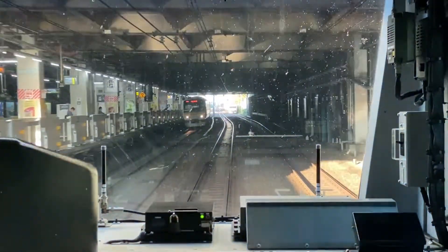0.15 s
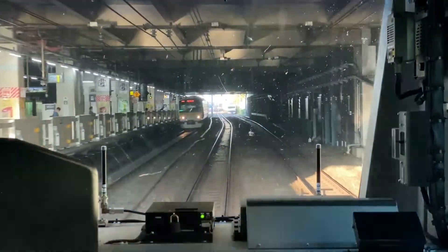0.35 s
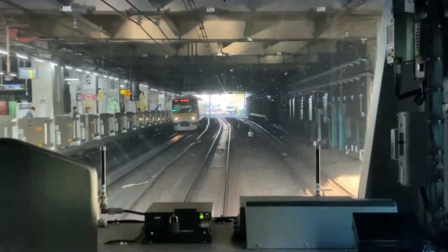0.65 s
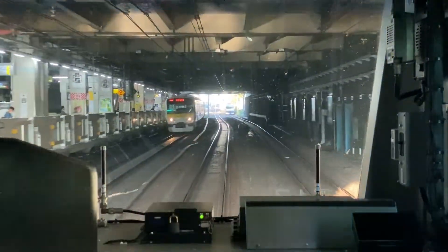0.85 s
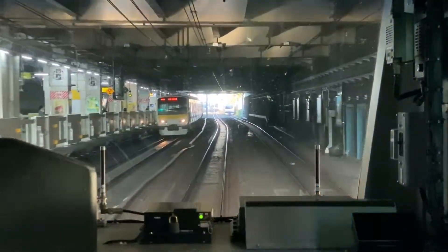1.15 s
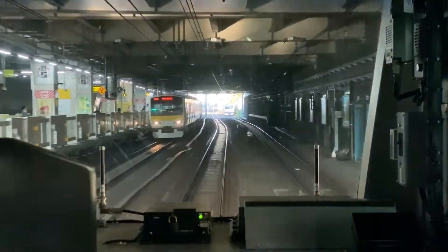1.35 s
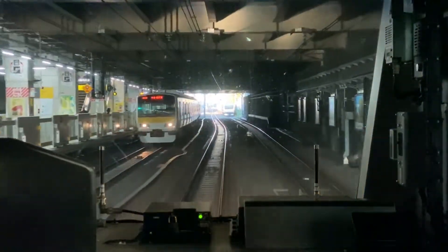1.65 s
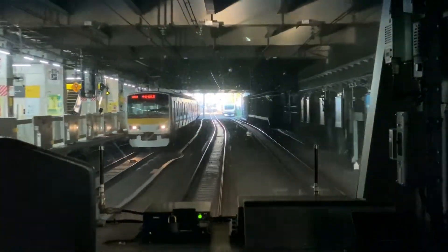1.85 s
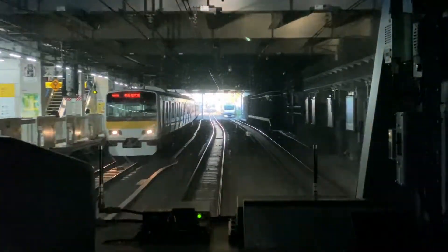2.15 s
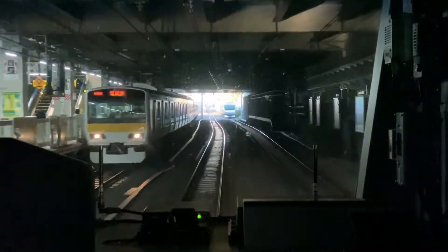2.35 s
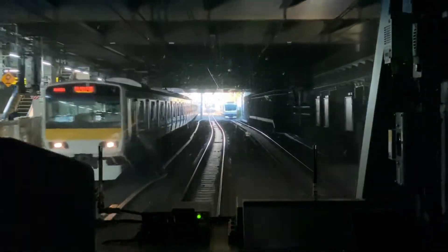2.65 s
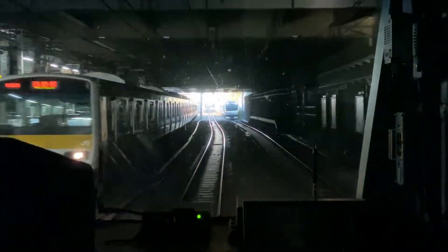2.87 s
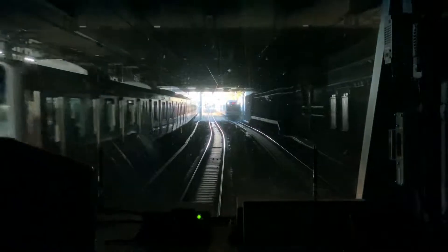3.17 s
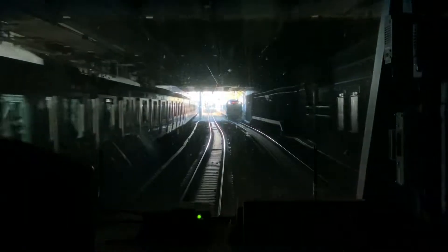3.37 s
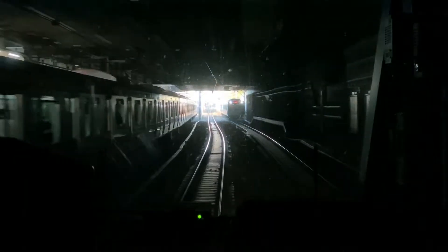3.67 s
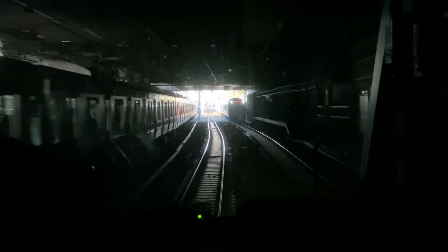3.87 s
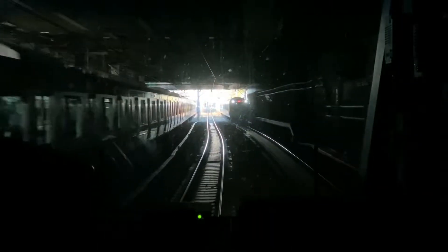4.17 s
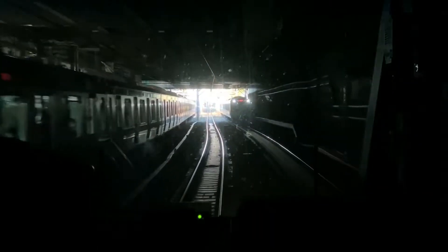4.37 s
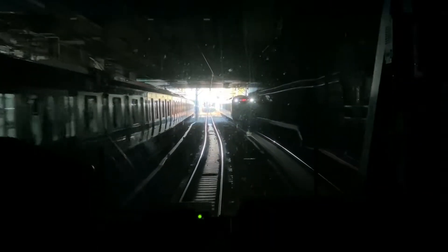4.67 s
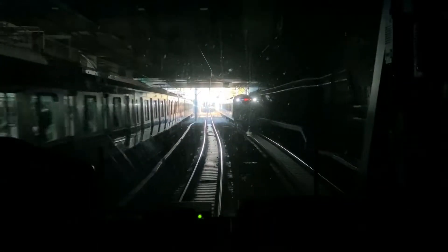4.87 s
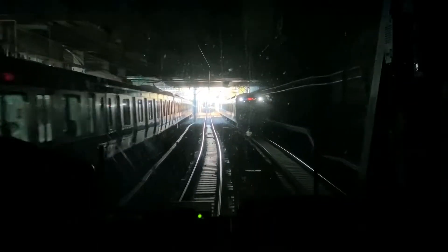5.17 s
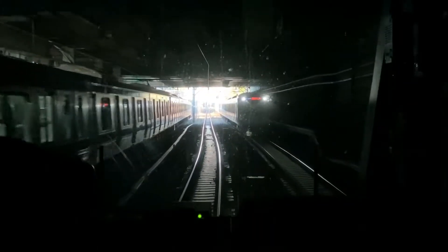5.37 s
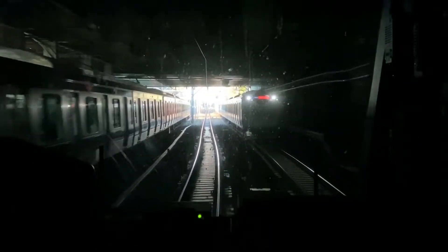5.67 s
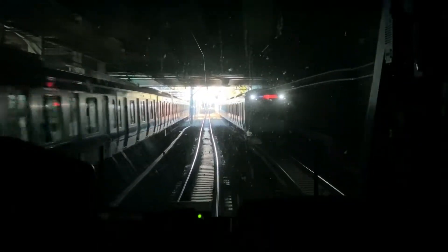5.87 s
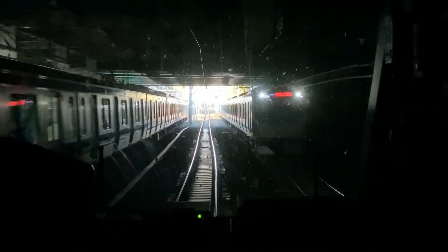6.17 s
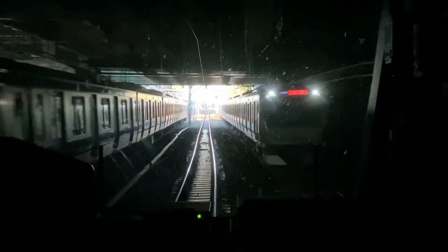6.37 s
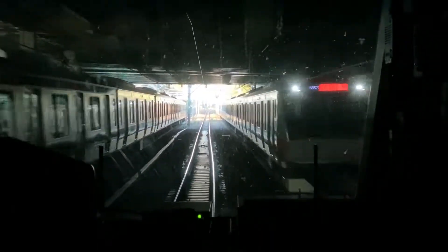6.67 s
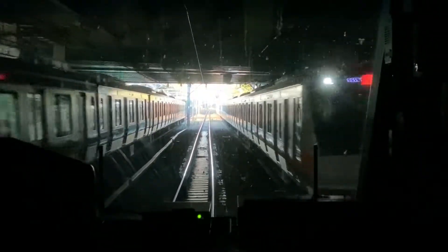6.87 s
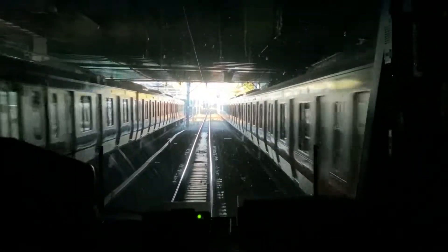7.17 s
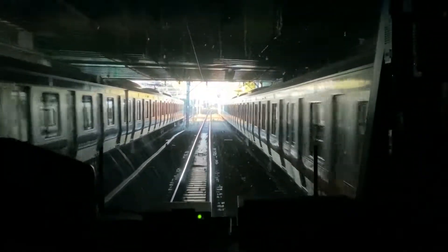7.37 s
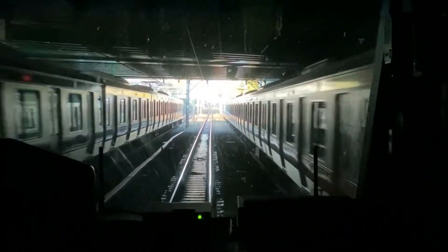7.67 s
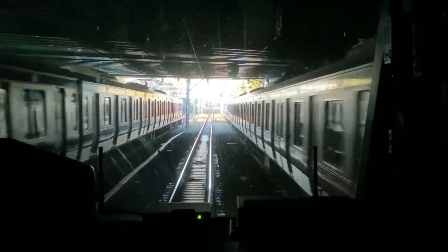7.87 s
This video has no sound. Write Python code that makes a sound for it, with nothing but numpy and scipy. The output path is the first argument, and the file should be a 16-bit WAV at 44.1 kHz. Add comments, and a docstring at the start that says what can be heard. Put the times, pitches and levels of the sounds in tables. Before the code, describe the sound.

Inside the front cab of an electric commuter train passing through a covered station at steady speed. From 0 to 1 s the rolling is rough and loud: roar, a howl sinking quickly within the first 0.4 s, bright flares of gear whine and a light clack near 0.55 s. Another swell of roar comes at 1.5 s, then the ride smooths into low rumble, a wavering, beating mid-low whine and thin hiss with faint whistles. An oncoming train's soft hum slowly sinks from about 2.7 s. At 3.65 s one hard crack and short damped boom stands out. From 4 s an even wash of passing cars joins; soft floor bumps come at 5.3, 5.5 and 6.3 s. Around 7.2 s a second train adds airy wind. At 7.4 s wheels slam over a rail joint in a tight clatter, followed by thuds, ticks, brief groans and rougher rumble until 8 s.

```python
"""A covered station, heard from the front cab of an electric commuter train running through at steady speed.
Shaped noise makes the floor rumble, the roar, the rail hiss and the wash of other trains sliding by.
Fluttering tones make the gear whine and its beats, thin wheel whistles and an oncoming train's sinking hum.
Ringing modes make one hard knock half way, the wheels' clatter over a rail joint and the booming floor;
decaying bursts of noise add thuds, clacks and, mostly near the end, ticks of loose fittings."""
import sys
import numpy as np
from scipy import signal
from scipy.fft import rfft, irfft, next_fast_len
from scipy.io import wavfile
from scipy.ndimage import uniform_filter1d, minimum_filter1d

SR = 44100
rng = np.random.default_rng(int(sys.argv[2]) if len(sys.argv) > 2 else 0)


def persist_wave(psi):
    """Save psi, clipped to +-1, as 16-bit WAV."""
    counts = np.round(np.clip(psi, -1, 1) * 32767).astype(np.int16)
    wavfile.write(sys.argv[1], SR, np.atleast_2d(counts).T)


N = 354122
TIME = np.arange(N) / SR
BINS = np.maximum(np.arange(N // 2 + 1) * SR / N, 1)  # Hz

# stereo width in the cab: f/Hz, side minus mid level/dB
WIDTH = [(25, -25), (60, -22.5), (150, -15.5), (380, -18), (560, -7), (800, -1.5), (1350, -2), (1600, -6.5),
         (1950, -18), (2250, -41.5), (3500, -18), (8000, 0.5)]
# state of the rail, over its smoothest stretch: t/s, roughness/dB
RAIL = [(0, 10.5), (.35, 10), (.7, 10.5), (.9, 2), (1.2, 5.5), (2, -0.7), (3.4, -1.06), (5, 0.5),
        (6.5, 0.5), (8.03, 6.5)]
# drive: t/s, tooth-mesh pitch f/Hz, roughness/0-1
DRIVE = [(0, 391.8, 1), (.6, 394.5, 0.55), (1.1, 386.9, 0.7), (1.8, 384.5, 0.25), (2.5, 389, 0.2),
         (3.5, 387.9, 0.5), (4.8, 386.9, 0.3), (5.5, 381.4, 0.6), (6.5, 386.2, 0.4), (7.2, 383.4, 0.8),
         (8, 383.1, 0.7)]


def from_db(db):
    """Decibels to gain."""
    return 10 ** (np.asarray(db) / 20)


def rms_one(x):
    """Scale to unit power."""
    return x / np.sqrt(np.mean(x ** 2) + 1e-20)


def in_time(rows):
    """Each column of a curve table at every sample."""
    s, *columns = np.transpose(rows)
    return [np.interp(TIME, s, column) for column in columns]


def gain_at(points, hz):
    """Gain of a spectrum, drawn in straight lines over log frequency, at the given frequencies."""
    at, db = np.transpose(points)
    return from_db(np.interp(np.log(hz), np.log(at), db))


def left_right(mid, side):
    """Two channels from their common and opposed parts."""
    return np.array([mid + side, mid - side])


def flutter(width_hz):
    """Complex random swell of unit power whose spectrum is a bell of the given width."""
    size = N // 32  # the swell is slow, so a thirty-second of the sample rate is enough
    bell = 1 / (1 + (BINS[:size // 2 + 1] / width_hz) ** 2) ** 2
    real, imaginary = irfft(rfft(rng.standard_normal((2, size))) * bell, size)
    coarse = rms_one(real) + 1j * rms_one(imaginary)
    return np.interp(np.linspace(0, size - 1, N), np.arange(size), coarse) / np.sqrt(2)


def narrow_line(pitch, rough, width_hz):
    """A steady tone plus a share that flutters, near unit power in the mid; the side always flutters."""
    rough = np.clip(rough, 0, 1)
    cycles = np.cumsum(pitch) / SR + rng.random()
    tone = np.sqrt(2) * np.exp(2j * np.pi * cycles)
    mid = np.sqrt(1 - rough) + np.sqrt(rough) * flutter(width_hz)
    side = gain_at(WIDTH, pitch.mean()) * flutter(width_hz)
    return left_right((tone * mid).real, (tone * side).real)


def cab_noise(spectrum):
    """Stereo noise of the given colour, diffuse where the cab makes it so; mid rms 1."""
    size = next_fast_len(N)
    hz = np.maximum(np.arange(size // 2 + 1) * SR / size, 1)
    treble_fall = 1 + (hz / spectrum[-1][0] / 2) ** 4
    bass_fall = 1 + (spectrum[0][0] / 2 / hz) ** 2
    colour = gain_at(spectrum, hz) / treble_fall / bass_fall
    white = rfft(rng.standard_normal((2, size)))
    mid, side = irfft(white * [colour, colour * gain_at(WIDTH, hz)], size)[:, :N]
    return left_right(mid, side) / np.std(mid)


def swell(s, half_width):
    """A bell in time, of height 1."""
    return np.exp(-((TIME - s) / half_width) ** 2)


def swells(rows):
    """Gain of a series of bells in time."""
    return sum(from_db(db) * swell(s, half_width) for s, half_width, db in rows)


def struck(s, rise, t60):
    """A quick rise at time s, then a steady decay."""
    age = np.clip(TIME - s, 0, 1)
    return (1 - np.exp(-age / rise)) * from_db(-60 * age / t60)


def arrive(s, rise):
    """A smooth step from 0 to 1 around time s."""
    return 1 / (1 + np.exp((s - TIME) / rise))


def ring(modes, hits, rise_cycles, sag=0, sag_s=0.0093):
    """Every hit rings the same modes; high ones answer first, low ones need longer to build up."""
    response, age = 0, TIME[:SR // 2]
    # struck hard, the pitch starts sharp by the share sag and relaxes over sag_s
    turned = age + sag * sag_s * (1 - np.exp(-age / sag_s))
    for k, (hz, db, t60) in enumerate(modes):
        build_up = 1 - np.exp(-(age * hz / rise_cycles) ** 2)
        decay = from_db(db - 60 * age / t60)
        polarity = (-1) ** k
        mode = polarity * decay * build_up * np.exp(2j * np.pi * hz * turned)
        response = response + left_right(mode.imag, gain_at(WIDTH, hz) * mode.real)
    out = np.zeros((2, N + SR))
    for s, db in hits:
        start = int(s * SR)
        out[:, start:start + len(age)] += from_db(db) * response
    return out[:, :N]


def track():
    """Levels of roar, drone and hiss in dB: each follows the state of the rail and swells over worn patches."""
    # worn patches under the wheels: t/s, half width/s, added roar level/dB, drone level/dB, hiss level/dB
    patches = [(.04, 0.14, 7, 5.5, 5.5), (0.221, 0.11, 0.5, 4.5, 0), (.58, 0.12, 2, 0.5, 0.5),
               (1.059, 0.12, 1.5, 2.5, 1), (1.5, 0.13, 7.5, 6, 0.5), (2.8, .07, 0, 9.5, 0.5),
               (3.95, 0.23, 1, 5, 2.5), (5.95, 0.33, 0, 4.5, 3), (7, 0.34, -0.5, 2, -1),
               (7.34, 0.069, 2, 9, 2), (7.62, 0.074, 0.5, 10, -2.5)]
    rough_db, = in_time(RAIL)
    patches_db = sum(np.outer(added_db, swell(s, half_width)) for s, half_width, *added_db in patches)
    # level on smooth rail in dB, plus dB gained per dB of roughness
    roar_db = -38 + 0.97 * rough_db
    drone_db = -34.5 + 0.62 * rough_db
    hiss_db = -47.5 + 0.48 * rough_db
    return patches_db + [roar_db, drone_db, hiss_db]


def rolling():
    """Rough wheels on rough rail: rumble in the floor, drone in the body panels, roar and hiss from the track."""
    # level of the floor rumble: t/s, level/dB
    rumble_level = [(0, -34), (1.1, -32.5), (2.9, -35.5), (4.15, -27.5), (4.6, -35), (5.4, -30.5),
                    (5.8, -32.5), (7, -29), (7.7, -25.5), (8.03, -30)]
    # colour of the floor rumble: f/Hz, density/dB per Hz
    rumble_colour = [(15, -28.5), (30, -14.5), (45, -7), (64, 1.5), (82, -4.5), (115, -8), (160, -11.5),
                     (210, -22), (400, -62)]
    # colour of the body panels: f/Hz, density/dB per Hz
    drone_colour = [(120, -22.5), (175, -10.5), (205, -1.5), (232, -5), (260, 0.5), (290, -3.5),
                    (330, -0.5), (380, -3.5), (450, -18.5), (800, -54)]
    # colour of the wheels: f/Hz, density/dB per Hz
    roar_colour = [(220, -26), (330, -8.5), (430, 7), (490, -2.5), (545, 2.5), (610, -5.5), (670, -2),
                   (830, -2), (930, -12), (1130, -12.5), (1330, -24), (1800, -17.5), (3000, -58)]
    # colour of the rail hiss: f/Hz, density/dB per Hz
    hiss_colour = [(700, -23), (1100, -8.5), (1370, -1.5), (1570, 6.5), (1730, 2), (1920, 7), (2150, -2.5),
                   (2450, -5), (2780, -4.5), (3500, -14.5), (4900, -25.5), (6400, -33.5), (7800, -47),
                   (9700, -44), (15500, -55.5)]
    rumble_db, = in_time(rumble_level)
    roar_db, drone_db, hiss_db = track()
    rumble = from_db(rumble_db) * cab_noise(rumble_colour)
    drone = from_db(drone_db) * cab_noise(drone_colour)
    roar = from_db(roar_db) * cab_noise(roar_colour)
    hiss = from_db(hiss_db) * cab_noise(hiss_colour)
    return rumble + drone + roar + hiss


def gear_lines(lines, pitch, rough):
    """Lines that follow the tooth-mesh pitch and flutter as the tooth load varies."""
    return sum(from_db(db) * narrow_line(multiple * pitch, rough, width_hz) for multiple, db, width_hz in lines)


def gears():
    """The mesh tone beats against its sidebands and sways with the tooth load; its overtones are more blurred."""
    # gear load, before the trims below: t/s, mesh tone level/dB, octave level/dB
    load_curve = [(0, -27, -29), (.3, -25.5, -35.5), (.6, -25, -24.5), (1.1, -23.5, -40.5),
                  (1.75, -30.5, -32.5), (2.4, -24, -35.5), (2.9, -29.5, -37.5), (3.2, -31.5, -37.5),
                  (3.6, -28.5, -40), (4, -30.5, -38.5), (4.25, -28, -47.5), (4.5, -31, -38),
                  (4.72, -27, -30.5), (5.2, -34, -29.5), (5.5, -28.5, -33), (6.1, -27.5, -38),
                  (6.65, -27, -35), (8.03, -28.5, -38)]
    # mesh tone with sidebands one shaft turn apart: multiple of the mesh pitch, level/dB, width/Hz
    mesh_lines = [(.953, -5, 6.4), (1, -3.5, 24), (1.047, -11, 13)]
    # lines around the octave: multiple of the mesh pitch, level/dB, width/Hz
    octave_lines = [(1.91, -7.5, 29), (1.95, -6.5, 22), (2.008, -7.5, 26)]
    # upper gear lines: multiple of the mesh pitch, level/dB, width/Hz
    high_lines = [(2.97, -26.5, 60.2), (4.02, -25, 31.75), (4.92, -25, 53.1)]
    mesh_trim_db, octave_trim_db, high_trim_db = 0.84, -1.5, 1.5
    sway_db, wander_hz, sway_width_hz = 2.3, 2.2, 16
    octave_share = 0.43  # how far the upper lines follow the octave; the rest follows the mesh tone

    pitch, rough = in_time(DRIVE)
    mesh_db, octave_db = in_time(load_curve)
    sway = np.sqrt(2) * flutter(sway_width_hz)
    pitch = pitch + wander_hz * sway.imag
    load = rms_one(from_db(sway_db * sway.real))
    mesh = from_db(mesh_db + mesh_trim_db) * gear_lines(mesh_lines, pitch, rough)
    octave = from_db(octave_db + octave_trim_db) * gear_lines(octave_lines, pitch, rough=0.99)
    high_db = mesh_db + octave_share * (octave_db - mesh_db) + high_trim_db
    high = from_db(high_db) * gear_lines(high_lines, pitch, rough=0.93)
    return load * (mesh + octave + high)


def flares():
    """A jerk presses the teeth together: for a moment the mesh tone and its overtones ring out clean."""
    # jerks of the drive: t/s, half width/s, mesh tone level/dB, octave level/dB
    jerks = [(0.063, 0.0076, -20, -27), (.185, 0.031, -15, -32.5), (0.419, 0.073, -25.5, -35),
             (0.577, 0.028, -14.5, -21), (.74, 0.046, -24, -33), (0.846, 0.014, -23.5, -35),
             (5.312, 0.014, -21, -38), (5.384, 0.014, -17, -42), (5.467, 0.019, -21, -40),
             (5.871, 0.016, -22.5, -39), (7.575, .028, -20.5, -36.5), (7.797, 0.012, -22.5, -53)]
    # overtones that ring with the octave: multiple of the mesh pitch, level/dB
    flare_overtones = [(2, 2), (3, -22.5), (4, -13.5)]
    side_width_hz = 16
    pitch, _ = in_time(DRIVE)
    mesh_gain = swells([(s, half_width, db) for s, half_width, db, _ in jerks])
    octave_gain = swells([(s, half_width, db) for s, half_width, _, db in jerks])
    overtones = sum(from_db(db) * narrow_line(multiple * pitch, 0, side_width_hz)
                    for multiple, db in flare_overtones)
    return mesh_gain * narrow_line(pitch, 0, side_width_hz) + octave_gain * overtones


def wheel_whistles():
    """Thin whistles of the wheels, of fixed pitch, that swell on rough rail."""
    # whistles: f/Hz, level/dB, width/Hz
    whistles = [(2747, -5, 10), (2765, -2, 70), (3768, -20, 45)]
    smooth_rail_db, follows = -62.5, 0.7  # follows: dB gained per dB of roughness
    rough_db, = in_time(RAIL)
    lines = sum(from_db(db) * narrow_line(np.full(N, hz), 0.75, width_hz) for hz, db, width_hz in whistles)
    return from_db(smooth_rail_db + follows * rough_db) * lines


def singing_lines():
    """Wheel resonances and gear lines that sing out for a moment."""
    # wheel resonances and gear lines: t/s, half width/s, f/Hz, level/dB, width/Hz
    moments = [(.11, 0.067, 2770, -42, 70), (1.52, 0.068, 2755, -47, 71), (2.35, .7, 2745, -56, 45),
               (2.57, 0.057, 4450, -71, 110), (2.72, .2, 3760, -67.5, 170), (5.83, .22, 2725, -50.5, 50),
               (1.15, 0.15, 1895, -47, 55), (2.99, 0.073, 1915, -50, 35), (4.951, .4, 1890, -45, 60),
               (5.8, .25, 1916, -47.5, 60), (5.9, .3, 1565, -50, 35), (0.584, .035, 1590, -36.5, 25),
               (7.7, 0.8, 1610, -51, 55), (.07, 0.092, 540, -30.5, 35), (.6, 0.058, 435, -27.5, 45),
               (4.24, 0.17, 735, -33.5, 25), (5.35, 0.16, 722, -39, 40)]
    total = 0
    for s, half_width, hz, db, width_hz in moments:
        tone = narrow_line(np.full(N, hz), 1.0, width_hz)
        total = total + from_db(db) * swell(s, half_width) * tone
    return total


def howl():
    """A rough resonance from worn rail sinks in pitch and dies away as the wheels leave it."""
    # the sinking howl: t/s, f/Hz, level/dB
    howl_curve = [(0, 432.7, -18.5), (.08, 352.6, -26), (.13, 368, -42), (.185, 362.8, -15.5),
                  (.25, 289, -24), (.32, 265.5, -32.5), (.45, 259, -69)]
    hz, db = in_time(howl_curve)
    return from_db(db) * narrow_line(hz, rough=0.49, width_hz=67)


def cab_air():
    """A faint steady hiss of air in the cab."""
    # colour of the air: f/Hz, density/dB per Hz
    air_colour = [(3000, -8), (4300, 1.5), (5200, -6), (6400, -1.5), (7800, -23), (9700, -17.5),
                  (15500, -29)]
    return from_db(-74) * cab_noise(air_colour)


def jolts():
    """Each blow sets off a dull thud and a steel clack that die away together; loose fittings add bright ticks."""
    # blows on the wheels and the cab: t/s, thud level/dB, clack level/dB, t60/s
    blows = [(.16, -31, -45.5, 0.28), (.555, -28.5, -33, 0.3), (3.648, -13.5, -28, .12),
             (4.138, -59, -37, .082), (7.386, -21, -21.5, 0.13), (7.395, -12, -25.5, 0.19),
             (7.412, -15, -22.5, 0.069), (7.426, -9, -27, 0.44), (7.526, -16.5, -31, 0.42),
             (7.635, -22.5, -31.5, 0.29)]
    # ticks of loose fittings: t/s, level/dB
    tick_hits = [(.555, -62.5), (1.723, -68), (3.058, -62), (4.138, -66), (7.398, -54), (7.459, -50.5),
                 (7.521, -48.5), (7.742, -54)]
    # colour of a thud through the floor: f/Hz, density/dB per Hz
    thud_colour = [(30, -29.5), (70, -4.5), (130, -2.5), (180, -3.5), (245, 2), (330, -2.5), (520, -12),
                   (800, -28), (2000, -60)]
    # colour of the steel clack: f/Hz, density/dB per Hz
    clack_colour = [(250, -13), (470, 6), (800, 1.5), (1020, 0), (1300, -5.5), (1590, -1), (1950, -7),
                    (2600, -9.5), (3900, -22), (4600, -33.5), (7000, -42.5), (12000, -57.5)]
    # colour of the ticks: f/Hz, density/dB per Hz
    tick_colour = [(1500, -20), (3500, 4.5), (6000, 7), (8000, -6.5), (10000, -8.5), (12000, -17),
                   (15500, -25)]
    rise_share = 0.0071  # rise time of a blow as a share of its t60
    rattle_db, rattle_hz = 0.5, 130

    # overlapping bursts add in power
    thud_power = clack_power = 0
    for s, thud_db, clack_db, t60 in blows:
        shape = struck(s, rise_share * t60, t60)
        thud_power = thud_power + (from_db(thud_db) * shape) ** 2
        clack_power = clack_power + (from_db(clack_db) * shape) ** 2
    tick_power = sum((from_db(db) * struck(s, rise=0.008, t60=0.22)) ** 2 for s, db in tick_hits)
    thud = np.sqrt(thud_power) * cab_noise(thud_colour)
    clack = np.sqrt(clack_power) * cab_noise(clack_colour)
    tick = np.sqrt(tick_power) * cab_noise(tick_colour)
    # loose parts chatter unevenly
    rattle = rms_one(from_db(rattle_db * rms_one(flutter(rattle_hz).real)))
    return thud + rattle * clack + tick


def scuff():
    """Short bright rubs of steel on steel that swell and fade."""
    # rubs: t/s, half width/s, level/dB
    rubs = [(1.805, 0.05, -44), (3.07, 0.021, -48), (7.545, .026, -45)]
    # colour of the rubs: f/Hz, density/dB per Hz
    rub_colour = [(1000, -10), (2000, 4.5), (2450, 3), (3200, -8.5), (4300, -24), (7000, -51)]
    return swells(rubs) * cab_noise(rub_colour)


def oncoming_hum():
    """The motors of the train on the next track fall in pitch as it passes, and fade behind the cab."""
    # hum of the oncoming train: t/s, f/Hz, level/dB
    hum_curve = [(2.4, 335, -60), (2.75, 331, -36.5), (3.25, 321, -39.5), (3.6, 311, -32.5),
                 (4.15, 299, -39), (4.7, 272, -39), (5.4, 262, -44.5), (6.2, 251, -36.5), (7, 243, -46)]
    hz, db = in_time(hum_curve)
    return from_db(db) * narrow_line(hz, rough=0.6, width_hz=13)


def knock():
    """A short crack in the cab wall, then a full boom that is soon damped; a faint, very high ring sounds with it."""
    # modes of the cab wall, before the low-pass and damping: f/Hz, level/dB, t60/s
    wall_modes = [(138, -7, .125), (202.8, -6.5, 0.65), (231.5, 1.5, 0.094), (264, 1.3, 0.1),
                  (286, -8.5, 0.35), (339, -4.5, 0.38), (401, -6.5, 0.11), (475, -15, 0.24),
                  (555, -12, 0.16), (633, -13.5, .096), (775, -28.5, .106), (1070, -17, 0.053),
                  (1330, -16, 0.035), (1624, -3.5, 0.018), (2703, -11, 0.006)]
    # modes of the faint high ring, before the damping: f/Hz, level/dB, t60/s
    high_ring_modes = [(5300, -44, .011), (7300, -57, .015), (9500, -64, .015), (11650, -73, .17),
                       (12350, -74, .17)]
    knock_s, hold_s, fade_s = 3.6445, 0.078, 0.012  # the ringing is damped once the hold is over
    wall = ring(wall_modes, [(knock_s, 0)], rise_cycles=0.66, sag=0.086)
    low_pass = signal.butter(3, 1480, fs=SR, output="sos")
    boom = signal.sosfilt(low_pass, wall)
    high_ring = ring(high_ring_modes, [(knock_s, -2.5)], rise_cycles=4.0)
    damping = 0.5 - 0.5 * np.tanh((TIME - knock_s - hold_s) / fade_s)
    return damping * (boom + high_ring)


def passing_trains():
    """Cars sliding by on the next tracks add an even wash; the second train squeezes bright wind past the cab."""
    # trains draw level, then their wash holds steady: t/s, rise/s, level/dB
    passes = [(4.1, .22, -48), (7.199, 0.28, -48.5)]
    # colour of a passing train: f/Hz, density/dB per Hz
    wash_colour = [(1200, -11.5), (1650, 6.5), (1900, 0.5), (2200, -4), (2650, -1.5), (3250, -5.5),
                   (3900, -17), (5000, -26), (8000, -49.5)]
    # colour of wind squeezed between the cab and the nearest train: f/Hz, density/dB per Hz
    wind_colour = [(3000, -2.5), (5000, 3), (7000, -6.5), (10000, -15.5), (15500, -19.5)]
    power = sum((from_db(db) * arrive(s, rise)) ** 2 for s, rise, db in passes)
    wash = np.sqrt(power) * cab_noise(wash_colour)
    wind = from_db(-65.5) * arrive(s=7.4, rise=0.25) * cab_noise(wind_colour)
    return wash + wind


def undercarriage():
    """The wheels drop into the rail joint and ring the bogie; bumps set the floor booming on its springs."""
    # modes of the bogie frame and its wheels: f/Hz, level/dB, t60/s
    bogie_modes = [(102.7, -0.5, 0.19), (137, -5, .14), (178, -9, .12), (234.8, -6, .3), (269, -5.5, 0.19),
                   (375.5, -4.5, .15), (444, -10, 0.18), (680, -15.5, 0.06), (785, -15, .07),
                   (956, -12.5, 0.053), (1046, -16.5, 0.076), (1575, -23, 0.069)]
    # drops into the rail joint: t/s, level/dB
    joint_strikes = [(7.3962, -11.5), (7.419, -6), (7.44, -13.5), (7.528, -30)]
    # modes of the floor: f/Hz, level/dB, t60/s
    floor_modes = [(67.6, 1, 0.1), (130, -8, 0.11)]
    # bumps under the floor: t/s, level/dB
    bumps = [(5.31, -19), (5.485, -14.5), (6.315, -18), (7.627, -10.5), (7.714, -10)]
    bogie = ring(bogie_modes, joint_strikes, rise_cycles=1)
    floor = ring(floor_modes, bumps, rise_cycles=0.55)
    return bogie + floor


def groans():
    """A low wheel resonance swells in short bouts."""
    # bouts: t/s, half width/s, level/dB
    bouts = [(7.351, 0.011, -29), (7.593, 0.0094, -28.5), (7.65, 0.0089, -29), (7.781, 0.014, -31.5),
             (7.897, .017, -29), (7.956, 0.012, -30.5)]
    groan_hz = 530
    return swells(bouts) * narrow_line(np.full(N, groan_hz), rough=0.15, width_hz=13)


def microphones(x):
    """The left microphone hears the cab a little later, and the balance of left and right varies with frequency."""
    # balance: f/Hz, left minus right level/dB
    balance = [(60, -1.1), (150, -.2), (290, -.5), (400, -1.1), (1000, .5), (2500, .3), (8000, -.6)]
    left_lag_s = 1.6e-5
    size = next_fast_len(N)
    hz = np.maximum(np.arange(size // 2 + 1) * SR / size, 1)
    lean = np.sqrt(gain_at(balance, hz))  # half the difference goes to each side
    lag = np.exp(-2j * np.pi * hz * left_lag_s)
    return irfft(rfft(x, size) * [lean * lag, 1 / lean], size)[:, :N]


def scene():
    """Everything that reaches the cab, over a faint hiss of air."""
    drive = gears() + flares()
    wheels = rolling() + wheel_whistles() + singing_lines() + howl() + groans()
    other_trains = oncoming_hum() + passing_trains()
    impacts = jolts() + scuff() + knock() + undercarriage()
    return microphones(drive + wheels + cab_air() + other_trains + impacts)


def limiter(x, ceiling_db, quick_db_per_s, slow_db_per_s, slow_share):
    """Peaks over the ceiling pull the gain down just in time; it recovers quickly at first, then slowly."""
    peak_db = 20 * np.log10(np.abs(x).max(axis=0) + 1e-9)
    over = np.maximum(peak_db - ceiling_db, 0)
    # each reduction jumps up with a peak and then falls at its own rate
    quick = np.maximum.accumulate(over + quick_db_per_s * TIME) - quick_db_per_s * TIME
    slow = np.maximum.accumulate(over + slow_db_per_s * TIME) - slow_db_per_s * TIME
    held = np.maximum(quick, slow_share * slow)
    gain_db = uniform_filter1d(minimum_filter1d(-held, size=45), size=45)
    return x * from_db(gain_db)


def record(dry):
    """A narrow notch in the microphone, a limiter, and the top is cut."""
    notch_hz, notch_q, cutoff_hz = 5700, 43, 15700
    coloured = signal.lfilter(*signal.iirnotch(notch_hz, notch_q, fs=SR), dry)
    limited = limiter(coloured, ceiling_db=-0.7, quick_db_per_s=302.0, slow_db_per_s=24, slow_share=0.55)
    top_cut = signal.ellip(10, 0.1, 80, cutoff_hz, fs=SR, output="sos")
    return signal.sosfilt(top_cut, limited)


dry = scene()
out = record(dry)
persist_wave(out)
```